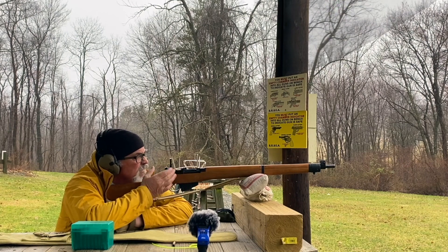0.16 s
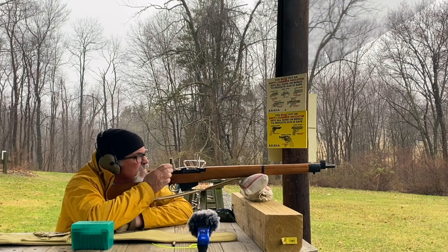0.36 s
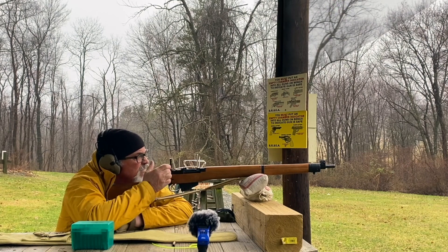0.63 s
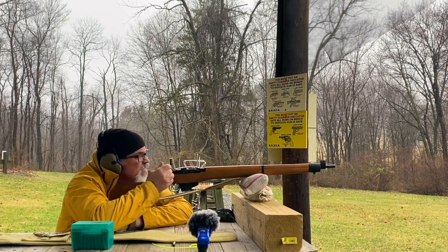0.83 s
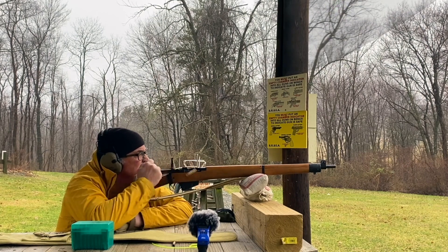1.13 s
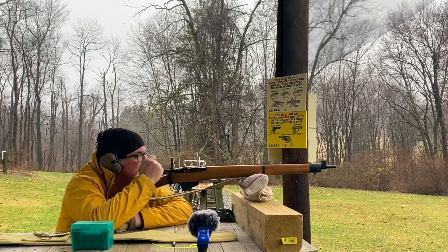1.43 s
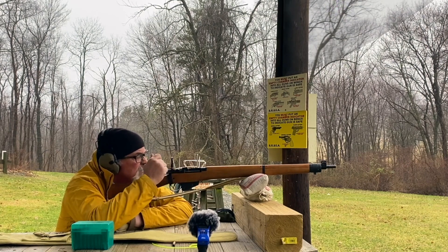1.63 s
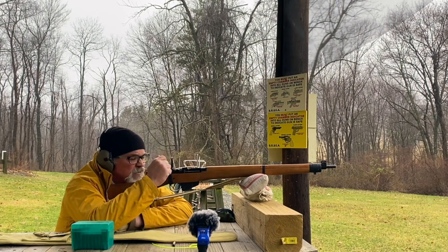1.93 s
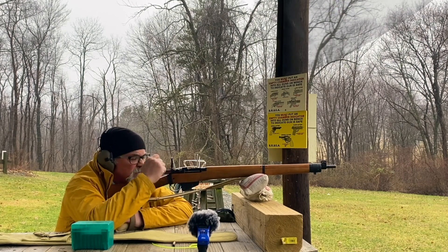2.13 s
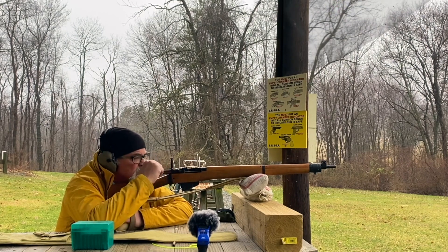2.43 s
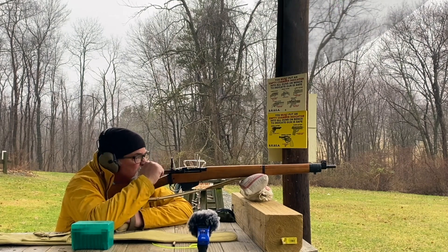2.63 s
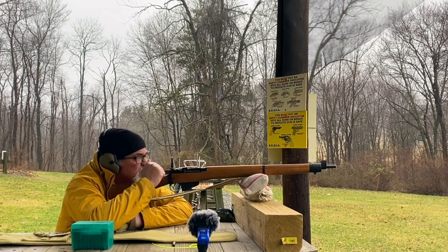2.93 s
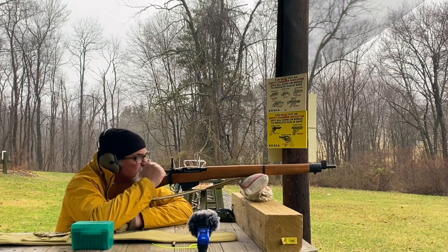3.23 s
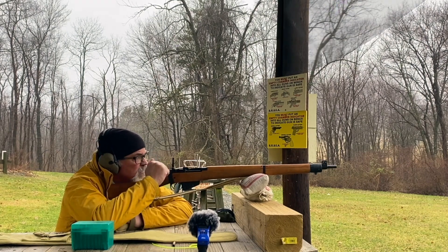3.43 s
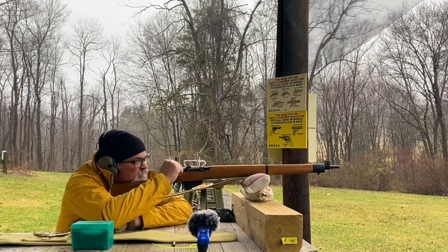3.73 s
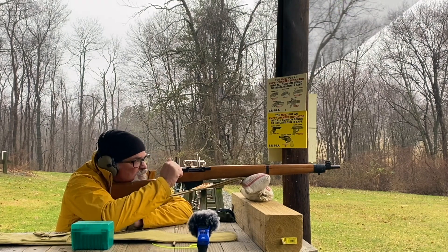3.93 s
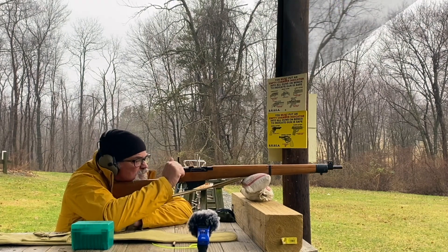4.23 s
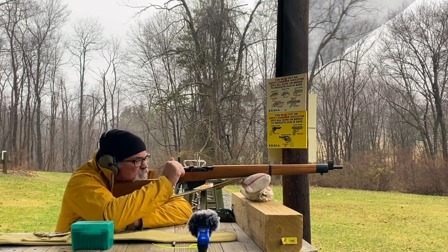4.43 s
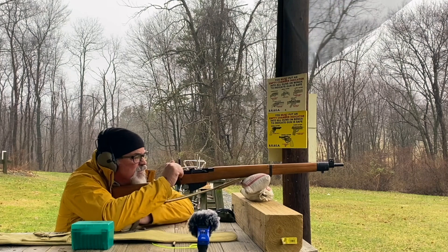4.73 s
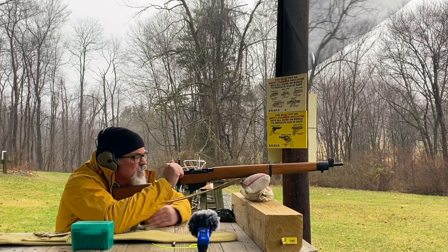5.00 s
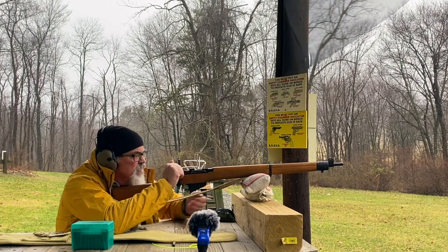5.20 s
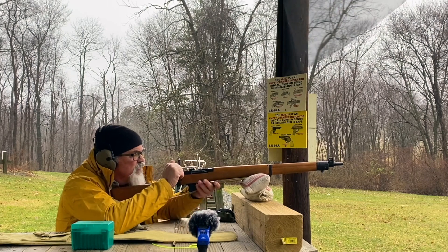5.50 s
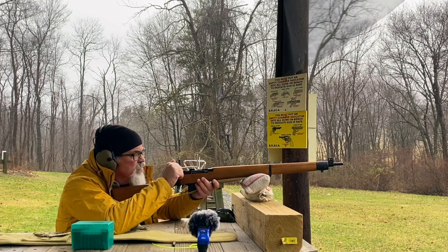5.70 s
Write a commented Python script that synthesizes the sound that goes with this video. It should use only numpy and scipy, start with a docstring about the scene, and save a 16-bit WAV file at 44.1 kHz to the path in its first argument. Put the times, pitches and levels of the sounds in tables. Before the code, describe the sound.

A steady soft hiss of rain and wind in trees runs throughout, with tiny drop ticks and low wind buffeting, strongest around 0.3 and 1.2-1.6 s. A faint sleeve rub at 0.2-0.4 s leads to a light touch at 0.57. At 0.85 s the bolt unlocks with a sharp steel clack; from 1.02 to 1.09 it scrapes back and hits its stop, louder, with a thin high brass ring. The case lands with a loud woody crack at 1.34 and a hollow, ringing bounce at 1.47, booming through the bench. Then only rain and nearer drops until 3.3 s, when light clicks precede a gritty slide and hard clacks at 3.53-3.69 as the bolt closes and locks. A low bench thump follows at 3.83, softer ones at 4.18 and 4.67, a small click at 4.73, and jacket rustling until 5.5. Close, dry stereo with a short tail; background dips after loud blows.

```python
"""At a wooden shooting bench, in light rain and wind, a rifle bolt is worked.
The bolt is drawn back, the spent brass case pings out and bounces, then the bolt is pushed home and locked.
Impacts are noise bursts with damped modes; rubbing, rain hiss and wind are coloured noise under envelopes.
The microphone stands on the bench and picks up its thumps; a jacket sleeve rustles as the arm shifts.
The recorder's gain control ducks the sound after loud blows and lets it creep back."""
import sys
import numpy as np
from scipy import signal
from scipy.fft import rfft, irfft, next_fast_len
from scipy.io import wavfile
from scipy.ndimage import uniform_filter1d, minimum_filter1d, map_coordinates

SR = 44100
rng = np.random.default_rng(int(sys.argv[2]) if len(sys.argv) > 2 else 0)


def dump_mix(stems):
    """Bounce the given channels to the path in sys.argv[1] as a 16-bit WAV at rate SR."""
    frames = np.atleast_2d(stems).T  # one column per channel
    limited = np.clip(frames, -1, 1)  # hard clip at full scale
    pcm = np.round(limited * 32767).astype(np.int16)
    wavfile.write(sys.argv[1], SR, pcm)


N = 258426
T = np.arange(SR // 2) / SR  # seconds since a blow
CLOCK = np.arange(N) / SR  # seconds since the start

# All table levels are relative: each source sets its own reference gain.
# steel contacts of the bolt: start_s, level_db, ping_db, knock_db (the last two relative to level_db)
BOLT_CONTACTS = [(0.5734, -21.5, 10.5, -3.5), (0.8437, -15.5, 13, -21), (0.852, 0, -9.5, -25),
                 (0.8575, 5, -6, -20), (0.8615, 8, -5, -46), (1.02, -5, 0, -31), (1.0282, 1, -1, -25),
                 (1.034, 2.5, -15, -36), (1.061, 3, 6.5, -40), (1.073, 14, -8, -15),
                 (1.0939, -2.5, 17.5, -40), (3.3094, -17.5, -11.5, -14.5), (3.3164, -19, 1, -7),
                 (3.3631, -13.5, -12, -10.5), (3.3684, -18, -10, -12), (3.4117, -12.5, 0, -5),
                 (3.472, -38.5, -13, 2), (3.5329, 8, 2.5, -16), (3.5413, 4.5, 1, -10.5),
                 (3.5629, 12, -1, -25), (3.5803, -8.5, -10, -10.5), (3.6219, -6, -6, -20),
                 (3.6624, -17, -5.5, 0), (3.6661, 2.5, 2.5, -18), (3.69, 2, -25.5, -40),
                 (4.7268, -9.5, 5.5, -17.5)]
# colour of a steel contact: frequency_hz, density_db (per Hz)
STEEL_COLOUR = [(300, -39), (600, -19), (1000, -9), (1800, -11.5), (2500, -2), (3400, -1.5), (4300, 0.5),
                (5500, -7), (7500, -14.5), (10000, -16.5), (14000, -39.5)]
# colour of the treble of hard contacts: frequency_hz, density_db (per Hz)
TREBLE_COLOUR = [(4000, -16.5), (7000, 1.5), (9500, -1), (11500, -4.5), (13000, -11), (16000, -22.5)]


def amp(db):
    """Level to amplitude: 20 dB is a factor of ten."""
    return 10 ** (np.asarray(db) / 20)


def unit(x):
    """Normalisation by the root mean square, to rms 1."""
    return x / np.sqrt(np.mean(x ** 2) + 1e-20)


def along(points, hz):
    """Interpolation of (frequency_hz, value) points on a logarithmic frequency axis."""
    f, v = np.transpose(points)
    return np.interp(np.log(hz + 1), np.log(f + 1), v)


def wobble(rate):
    """Band-limited random fluctuation: a smooth curve through rate random knots a second."""
    knots = rng.standard_normal(int(N * rate / SR) + 4)
    return map_coordinates(knots, [np.arange(N) * rate / SR])


def filtered(x, response):
    """Linear filtering: the spectrum of x times a response of frequency."""
    n = x.shape[-1]
    m = next_fast_len(n + 8192)
    return irfft(rfft(x, m) * response(np.fft.rfftfreq(m, 1 / SR)), m)[..., :n]


def noise(spectrum, side_db, size):
    """Coloured stereo noise of rms 1; the level of its side signal sets the width."""
    mid, side = filtered(rng.standard_normal((2, size)), lambda hz: amp(along(spectrum, hz)))
    side = amp(side_db) * side
    return unit(np.array([mid + side, mid - side]))


def fade(t60, attack):
    """Exponential decay by 60 dB in t60 seconds after a quick rise; its top is 1."""
    decay = amp(-60 * T / max(t60, .002))
    rise = 1 - np.exp(-T / max(attack, 1e-5))
    shape = decay * rise
    return shape / shape.max()


def ring(modes, scatter_db, spread, attack):
    """Modal sum of damped sines at new strengths; each meets the two capsules spread radians apart."""
    out = np.zeros((2, len(T)))
    for hz, db, t60 in modes:
        start_phase = rng.uniform(0, 2 * np.pi)
        phase = start_phase + spread * rng.choice([-1, 1]) * np.array([[.5], [-.5]])
        strength = amp(db + scatter_db * rng.normal())
        out += strength * fade(t60, attack) * np.sin(2 * np.pi * hz * T + phase)
    return out


def add(track, s, sound):
    """Superposition of a sound on a track from time s."""
    part = track[:, max(round(s * SR), 0):][:, :sound.shape[1]]
    part += sound[:, :part.shape[1]]


def pan(left_db):
    """Level difference between the channels, left over right."""
    return amp([[left_db / 2], [-left_db / 2]])


def weather():
    """Broadband noise of steady rain and wind in the trees, and turbulent low-frequency wind on the capsules."""
    # two gusts, then a light breeze: start_s, buffet_db
    wind = [(0, -61), (.3, -43.5), (.8, -52), (1.15, -39.5), (1.6, -43.5), (2.1, -56), (5.8, -54)]
    # colour of the hiss: frequency_hz, density_db (per Hz)
    air_colour = [(53, -45.5), (90, -2.5), (133, -3), (192, -3.5), (310, -6.5), (510, -11), (676, -10.5),
                  (1410, -13.5), (1680, -15), (4550, -21.5), (6300, -28), (11800, -32), (16000, -40)]
    # colour of the wind on the capsules: frequency_hz, density_db (per Hz)
    rumble_colour = [(15, -11.5), (40, 1), (80, -5), (130, -5.5), (300, -28.5), (800, -71.5)]
    start_s, level_db = np.transpose(wind)
    buffet_db = np.interp(CLOCK, start_s, level_db)
    waver = amp(.35 * wobble(9))
    hiss = amp(-45.5) * waver * noise(air_colour, side_db=-4.5, size=N) * pan(2.54)
    gusting = amp(buffet_db + 9.0 + 3.3 * wobble(39))
    buffet = gusting * noise(rumble_colour, side_db=1.5, size=N) * pan(1.8)
    return hiss + buffet


def sleeve():
    """Friction noise follows the stroke: the jacket swishes in fine grains, the elbow drags over the bench."""
    # strokes of the arm: middle_s, length_s, swish_db, rub_db
    strokes = [(0.213, 0.17, -51.5, -43.5), (0.43, 0.059, -76, -35.5), (3.4, 0.13, -55, -40.5),
               (4.686, 0.2, -39.5, -31.5), (4.947, 0.22, -41.5, -39), (5.24, 0.27, -45, -36.5),
               (5.429, 0.13, -35, -35)]
    # colour of the swishing cloth: frequency_hz, density_db (per Hz)
    cloth_colour = [(260, -39), (450, -19.5), (555, -1), (771, -10), (830, -5.5), (1560, -7), (2230, -3.5),
                    (4050, -9), (6530, -10), (7470, -9), (11900, -14.5), (14800, -21.5), (16000, -39)]
    # colour of the rubbing on the bench: frequency_hz, density_db (per Hz)
    rubbing_colour = [(50, -38), (115, 5), (190, -5.5), (300, -9), (600, -29), (1500, -70)]
    swishing, rubbing = np.zeros(N), np.zeros(N)
    for middle, length, swish_db, rub_db in strokes:
        speed = np.exp(-2 * ((CLOCK - middle) / length) ** 2)
        # overlapping strokes add as powers
        swishing = np.hypot(swishing, amp(swish_db) * speed)
        rubbing = np.hypot(rubbing, amp(rub_db) * speed)
    swish = swishing * noise(cloth_colour, side_db=-9, size=N)
    swish = swish * unit(amp(2.0 * wobble(400) + 2.1 * wobble(40)))
    return swish * pan(0.97) + rubbing * noise(rubbing_colour, side_db=3.5, size=N)


def drops():
    """Random impulses excite short splashes: a few close drops over many faint ones."""
    # the closest raindrops: start_s, level_db
    close_drops = [(0.2917, -36), (0.521, -39), (1.8326, -35.5), (2.2562, -39), (2.3434, -38),
                   (2.4638, -33), (2.735, -37), (2.8223, -32.5), (3.0054, -35), (4.4598, -33),
                   (5.0483, -29), (5.6185, -36.5), (5.783, -36.5)]
    # colour of a raindrop: frequency_hz, density_db (per Hz)
    splash_colour = [(1500, -15.5), (3500, -3.5), (6000, 3), (9000, 2.5), (12000, -6), (16000, -20)]
    drops_per_s, far_drop_db, drop_spread_db = 32, -48.5, 3.5  # faint drops in each channel
    out = np.zeros((2, N))
    for s, db in close_drops:
        drop = noise(splash_colour, side_db=-2.5, size=len(T)) * fade(0.058, attack=0.001)
        add(out, s, amp(db - 6.5) * drop * pan(6.6))
    falls = rng.random((2, N)) < drops_per_s / SR
    hits = falls * amp(drop_spread_db * rng.standard_normal((2, N)).clip(-2, 2))
    splash = noise(splash_colour, side_db=7.5, size=len(T)) * fade(0.096, attack=0.00092)
    return out + amp(far_drop_db) * signal.fftconvolve(hits, splash, axes=1)[:, :N]


def bolt():
    """Impact excitation: a burst of chatter, a ping damped by the hand, a stock knock and the receiver's ring."""
    # movements of the bolt colour the contacts made during them: start_s, ping_hz, knock_hz, treble_db
    # in turn: hand takes the knob, unlocked, drawn back, pushed forward, driven home and locked,
    # a last click as the grip shifts
    moves = [(.5, 3320, 824, -41), (.8, 3390, 907, -6), (.95, 3250, 928, -11.5), (3.2, 3480, 653, -23.5),
             (3.5, 3543, 638, -13), (4.5, 3330, 830, -21)]
    # ringing of the receiver: frequency_hz, level_db, t60_s
    receiver_modes = [(940, -6, .06), (2200, -3, .09), (2690, -2, .15), (3090, -5, .11), (3260, -1, .14),
                      (3360, -6, .14), (3510, -1, .12), (4000, -7, .11), (4170, -3, .08), (4450, -7, .09),
                      (5910, -6, .12), (7500, -9, .1), (8000, -8, .1), (9600, -9, .11)]
    # colour of a knock in the stock: frequency_hz, density_db (per Hz)
    stock_colour = [(200, -39.5), (450, -17), (650, -0.5), (1100, -2), (2000, -5.5), (4000, -20),
                    (16000, -50)]
    contact_t60_s, shorter_per_db = 0.016, 0.0151  # at level 0 dB; stronger contacts are shorter
    pitch_scatter = .028  # relative spread from contact to contact
    micro_hits_per_s, micro_hits_db = 1400, 4  # the faces meet in a run of tiny uneven impacts
    out = np.zeros((2, N))
    uneven = unit(amp(micro_hits_db * wobble(micro_hits_per_s).clip(-2, 2)))
    for s, db, ping_db, knock_db in BOLT_CONTACTS:
        _, ping_hz, knock_hz, treble_db = [move for move in moves if move[0] <= s][-1]
        ping_hz = ping_hz * np.exp(pitch_scatter * rng.normal())
        knock_hz = knock_hz * np.exp(pitch_scatter * rng.normal())
        t60 = contact_t60_s * np.exp(-shorter_per_db * db)
        # the faces chatter for a moment, then part quickly; loose parts jingle on
        contact = amp(-60 * (T / t60) ** 1.567)
        hits = uneven[round(s * SR):][:len(T)]
        jingle = amp(-20) * fade(.12, attack=0.0011)
        blow = hits * contact * (1 - np.exp(-T / 0.00058)) + jingle
        chatter = amp(-6.5) * noise(STEEL_COLOUR, side_db=-14.5, size=len(T)) * blow
        # the treble is strongest in the first instant of the contact
        sharp_blow = hits * contact ** 2 + 0.78 * jingle
        edge = amp(treble_db + 1.5) * noise(TREBLE_COLOUR, side_db=-7.5, size=len(T)) * sharp_blow
        body = amp(knock_db - 2) * noise(stock_colour, side_db=-8, size=len(T)) * blow
        ping = ring([(ping_hz, 0, .02)], scatter_db=-2.0, spread=0.16, attack=0.00057)
        knock = ring([(knock_hz, 0, .034)], scatter_db=-3.5, spread=.3, attack=0.0021)
        tones = amp(ping_db - 9) * ping + amp(knock_db - 0.5) * knock
        receiver = amp(-29) * ring(receiver_modes, scatter_db=-3, spread=0.92, attack=0.00046)
        add(out, s, amp(db) * (chatter + edge + body + tones + receiver))
    return out


def bench():
    """Structure-borne modes: the bench rocks the microphone stand, moving its capsules largely in opposition."""
    # the case, arms and stock thump the bench: start_s, sway_db, boom_db
    thumps = [(.576, -46, -24), (0.976, -13.5, -38), (1.159, -8.5, -45.5), (1.346, -2, 4),
              (1.468, -9.5, 2.5), (3.009, -26, -33), (3.833, -7.5, -20), (3.904, -30, -56),
              (4.179, -15.5, -25.5), (4.665, -17.5, -25.5)]
    # upper modes of the bench: frequency_hz, level_db, t60_s
    boom_modes = [(126, -16.5, 0.076), (183, -2.5, 0.12), (218.2, -0.5, 0.25), (287, -6.5, 0.14),
                  (336, -9.5, 0.084)]
    sway_hz, swell_s = 123.64, .054  # the bench's lowest mode and the length of its first swell
    bolt_sway_db, bolt_boom_db = -25.5, -35.5  # share of a bolt contact that comes through the stock
    out = np.zeros((2, N))
    first_swell = np.abs(np.sin(np.pi * np.minimum(T / swell_s, 1))) ** 1.3
    swell = first_swell + amp(-9.5) * fade(0.32, attack=0.077)
    sway = np.sin(2 * np.pi * sway_hz * T + np.array([[2.4], [0]])) * swell
    jolts = [(s, db + bolt_sway_db, db + bolt_boom_db) for s, db, *_ in BOLT_CONTACTS]
    for s, sway_db, boom_db in list(thumps) + jolts:
        boom = ring(boom_modes, scatter_db=1, spread=1.43, attack=0.005) * [[1], [-1]]
        add(out, s, amp(sway_db - 5.5) * sway * pan(-5.5) + amp(boom_db - 6.5) * boom * pan(7.6))
    return out


def slides():
    """Stick-slip friction: the bolt rubs in its track, steel on steel, catching and slipping unevenly."""
    # the bolt slides in its track: start_s, end_s, level_db
    strokes = [(0.983, 1.087, -27), (3.287, 3.425, -48), (3.52, 3.614, -17), (3.588, 3.654, -26),
               (3.702, 3.707, -8)]
    stroke = np.zeros(N)
    for start, end, db in strokes:
        stroke += amp(db) * np.clip(np.minimum(CLOCK - start, end - CLOCK) / 0.012, 0, 1)
    grit = noise(STEEL_COLOUR, side_db=-20.0, size=N)
    grit = grit + amp(-12) * noise(TREBLE_COLOUR, side_db=-2, size=N)
    slips = unit(amp(4.5 * wobble(600).clip(-2, 2)))
    return stroke * grit * slips


def band(centre_hz, octave_db):
    """Band-pass spectrum that falls by octave_db an octave on both sides of its centre."""
    return [(centre_hz * 2. ** k, -octave_db * abs(k)) for k in (-6, 0, 6)]


def scuffs():
    """Friction of hand and stock on the rest: short bursts of band noise with gritty modulation."""
    # rubs: start_s, level_db, centre_hz, t60_s
    rubs = [(1.003, -27.5, 660, 0.15), (3.832, -31.5, 410, 0.032), (4.173, -38, 332, 0.039),
            (4.301, -42.5, 1800, 0.065), (4.65, -39, 650, 0.23), (5.094, -42.5, 1790, 0.092),
            (5.368, -35, 660, 0.12)]
    grit_db, grit_per_s = 3.5, 250
    out = np.zeros((2, N))
    for s, db, centre_hz, t60 in rubs:
        rub = noise(band(centre_hz, octave_db=15.0), side_db=-11.0, size=len(T))
        add(out, s, amp(db) * rub * fade(t60, attack=t60 / 9))
    return out * unit(amp(grit_db * wobble(grit_per_s)))


def case_ring():
    """Modes of a thin shell: the brass case rings as it is pulled out, and again as it lands."""
    # blows that set the case ringing: start_s, level_db
    pings = [(1.005, -21), (1.029, -27), (1.06, -14.5), (1.092, -19), (1.468, -28.5)]
    # modes of the case: frequency_hz, level_db, t60_s
    brass_modes = [(8382, -1, .2), (11085, -4, .2), (11120, -1, .22), (11520, -3, .27)]
    out = np.zeros((2, N))
    for s, db in pings:
        add(out, s, amp(db - 3) * ring(brass_modes, scatter_db=1, spread=1.1, attack=.002))
    return out


def case_bounces():
    """Impacts excite plank modes: the case cracks and clacks, the wood rings on over a hollow knock."""
    # bounces on the bench top: start_s, level_db, ring_db, hollow_db, t60_s
    bounces = [(1.323, -6, -28, 6.5, 0.017), (1.3446, 16, -10, -13, 0.029), (1.426, -19.5, -7, -6, 0.021),
               (1.452, -17.5, -11, -4, .04), (1.468, 1, -2, -3, 0.042), (1.5007, -8.5, -3, -17, 0.053)]
    # modes of the planks: frequency_hz, level_db, t60_s
    plank_modes = [(549, -6, .1), (645, -2.5, .065), (740, -7, .05), (1001, -13, .09), (1362, 4, .065),
                   (1460, -20, .28), (1620, -11, .05), (1720, -10, .06), (1920, 2.5, .065), (2040, -4, .05),
                   (2250, -8, .05), (2640, -8, .055), (3080, -7, .045)]
    # colour of the clack: frequency_hz, density_db (per Hz)
    clack_colour = [(150, -10), (300, -9), (450, -5.5), (700, 3), (1050, -7.5), (1900, -1.5), (3000, -9),
                    (4500, -20), (8000, -30), (14000, -51)]
    hollow_modes = [(630, -2, .02), (790, 0, .02)]  # frequency_hz, level_db, t60_s
    out = np.zeros((2, N))
    for s, db, ring_db, hollow_db, t60 in bounces:
        # the case rim's first touch on the bench
        crack = amp(-28) * noise(TREBLE_COLOUR, side_db=1.5, size=len(T)) * fade(.012, attack=0.00021)
        decay = fade(t60, attack=.0003) + amp(-21) * fade(t60 * 2.8, attack=.004)
        clack = amp(-7) * noise(clack_colour, side_db=-4, size=len(T)) * decay
        wood = amp(ring_db - 6) * ring(plank_modes, scatter_db=1, spread=1.3, attack=.0005)
        hollow = amp(hollow_db - 8) * ring(hollow_modes, scatter_db=1, spread=.7, attack=.002)
        add(out, s, amp(db) * (crack + clack + wood + hollow))
    return out


def shelter(x):
    """Reverberation by convolution: roof and bench answer with a short tail, new every quarter second."""
    # decay of the tail: frequency_hz, t60_s
    decay_times = [(200, 0.71), (1000, 0.18), (3500, 0.2), (10000, 0.09), (15000, 0.18)]
    wet = np.zeros((2, N))
    for start in np.arange(0, N / SR, .25):
        hz, age, z = signal.stft(rng.standard_normal((2, SR // 3)), SR, nperseg=256)
        decay = amp(-60 * age / along(decay_times, hz)[:, None])
        tail = signal.istft(z * decay, SR, nperseg=256)[1]
        tail = tail / np.linalg.norm(tail[0])
        piece = x[:, round(start * SR):round((start + 1 / 4) * SR)].mean(0)
        add(wet, start + 0.0033, signal.fftconvolve(piece[None], tail, axes=1))
    return wet


def gain_control(x):
    """Dynamic compression: a loud blow turns the gain down at once; it is held, then creeps back."""
    threshold_db, max_cut_db = -9, 9
    hold_s, release_s = 0.15, 0.34  # release_s is the time constant of the recovery in dB
    power = np.abs(uniform_filter1d((x ** 2).max(0), size=129))
    over_db = np.clip(10 * np.log10(power + 1e-12) - threshold_db, 1e-6, max_cut_db)
    hold = int(hold_s * SR)
    held_db = -minimum_filter1d(-over_db, hold, origin=(hold - 1) // 2)
    # a running maximum in which each held cut decays exponentially
    age = CLOCK / release_s
    cut_db = np.exp(np.maximum.accumulate(np.log(held_db) + age) - age)
    return x * amp(-uniform_filter1d(cut_db, size=65))


def scene():
    """Superposition of all sources; the steel's sound reaches the right capsule first, by 11 microseconds."""
    lead = np.array([[-.5], [.5]]) * 1.1e-5  # seconds, left and right
    steel = filtered(bolt() + slides(), lambda hz: np.exp(2j * np.pi * hz * lead))
    brass, wood = case_ring(), case_bounces()
    echo = shelter(amp(-24) * (steel + brass) + amp(-21) * wood) * pan(8.1)
    blows = steel * pan(0.82) + brass + wood * pan(-1.1) + echo
    return blows + bench() + scuffs() + sleeve() + drops() + weather()


def record(dry):
    """Gain reduction and band limiting: gain control, a fast peak limiter, then a steep low-pass."""
    top_hz = 16000
    ducked = gain_control(dry)
    needed = 1 / np.maximum(np.abs(ducked).max(0), 1)
    gain = uniform_filter1d(minimum_filter1d(needed, size=65), size=65)
    return filtered(ducked * gain, lambda hz: 1 / (1 + (hz / top_hz) ** 80))


dry = scene()
out = record(dry)
dump_mix(out)
```